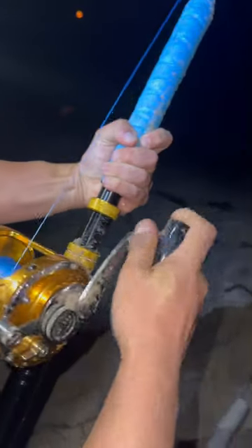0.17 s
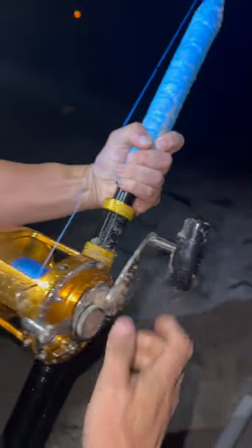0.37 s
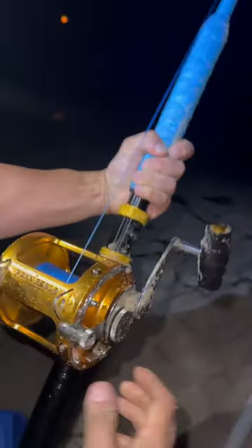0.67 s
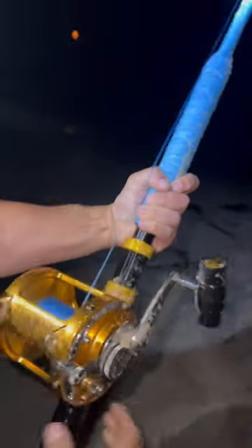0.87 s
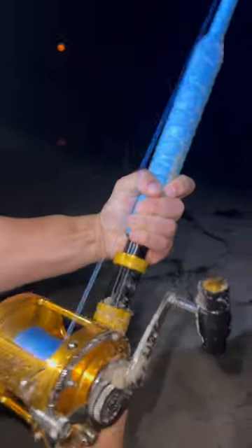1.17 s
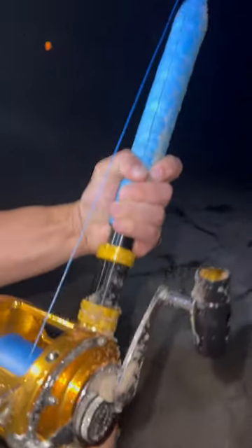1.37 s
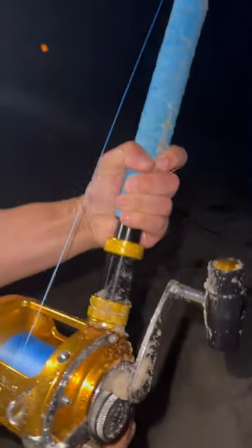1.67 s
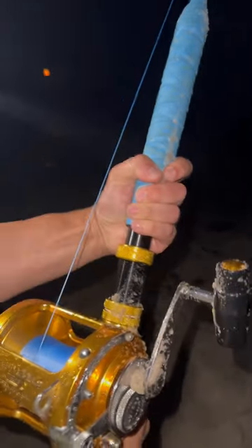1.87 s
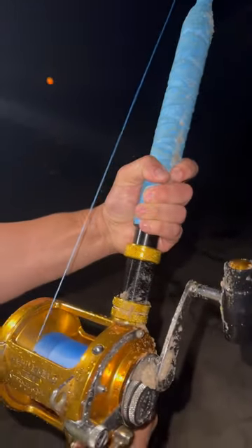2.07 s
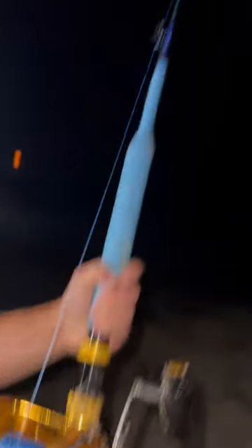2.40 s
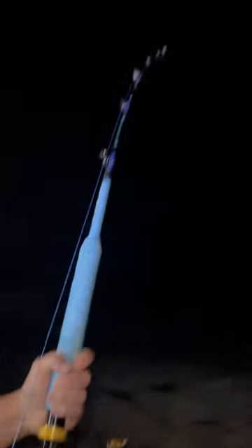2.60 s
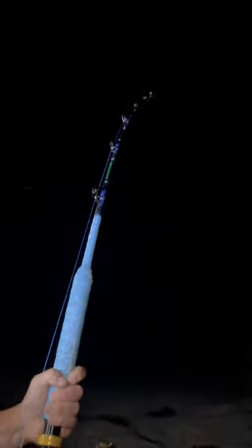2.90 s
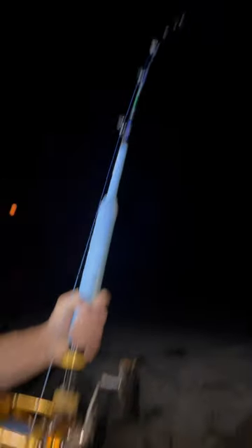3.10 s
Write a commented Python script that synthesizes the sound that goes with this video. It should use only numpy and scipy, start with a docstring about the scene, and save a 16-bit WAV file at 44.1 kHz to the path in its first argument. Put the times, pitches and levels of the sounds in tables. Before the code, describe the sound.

Close stereo pickup by the shore at night: reel clicker starts with separate soft ticks among hand knocks and wind thumps, then accelerates into a loud continuous ratchet with a faint fuzzy whir beneath.

```python
"""By the shore at night, close to a big fishing reel: as line is pulled off, the clicker pawl ticks over its
gear, slowly at first, then as a fast rattle. Each click is a short noise scrape with a tick that rings the
metal housing. Under it lie knocks on rod and handle (sines of falling pitch), wind rumble and a distant wash
(shaped noise), and a fuzzy whir (a drifting resonance). The two microphone ports hear the reel's treble
out of phase."""
import sys
import numpy as np
from scipy import signal
from scipy.fft import rfft, irfft
from scipy.io import wavfile
from scipy.ndimage import uniform_filter1d

SR = 44100
rng = np.random.default_rng(int(sys.argv[2]) if len(sys.argv) > 2 else 0)


def to_wav(sig):
    """Store sig (one row per channel, or 1-D mono) as 16-bit WAV at the path in sys.argv[1].

    Samples outside -1..1 are clipped; the rate is SR.
    """
    pcm = np.clip(np.atleast_2d(sig), -1, 1) * 32767
    pcm = np.round(pcm).astype(np.int16)
    wavfile.write(sys.argv[1], SR, pcm.T)  # frames by channels


N = 143325


def amp(db):
    """Amplitude factor for a level in dB."""
    return 10 ** (np.asarray(db) / 20)


def evened(x):
    """Scale a signal to an RMS of 1 over all its channels."""
    return x / np.sqrt(np.mean(x ** 2) + 1e-20)


def over_time(table, index):
    """One column of a table at every sample, in straight lines between its times."""
    rows = np.array(table)
    return np.interp(np.arange(N) / SR, rows[:, 0], rows[:, index])


def over_frequency(points, hz):
    """A curve of (f/Hz, value) points, in straight lines over log frequency."""
    f, value = np.transpose(points)
    return np.interp(np.log(hz + 1), np.log(f + 1), value)


def resonate(x, hz, width):
    """Shift down by hz, smooth, shift back: a resonance of gain 1 whose pitch may move."""
    turn = np.exp(2j * np.pi * np.cumsum(hz * np.ones(N)) / SR)
    r = np.exp(-np.pi * width / SR)
    smooth = signal.lfilter([1 - r], [1, -r], x / turn + 1e-18)
    return 2 * (turn * smooth).real


def noise(colour, same, patchy_db):
    """Two-channel coloured noise with drifting patches; same(hz) is the left-right likeness."""
    frames, hz = N // 256 + 5, np.fft.rfftfreq(1024, 1 / SR)
    a, b, c, d, patches = rng.standard_normal((frames, 513, 5)).T
    patches = uniform_filter1d(patches, 8, 0)
    patches = evened(uniform_filter1d(patches, 8, 1))
    share = np.clip(same(hz), -1, 1)[:, None]
    left = a + 1j * b
    right = share * left + np.sqrt(1 - share ** 2) * (c + 1j * d)
    spectrum = np.array([left, right])
    spectrum *= amp(over_frequency(colour, hz)[:, None] + patchy_db * patches)
    return evened(signal.istft(spectrum, nperseg=1024, noverlap=768)[1][:, :N])


def wash(hits):
    """Wide distant hiss, and a low whir of drifting pitch: a resonance driven by hiss and clicks."""
    # wash and whir as they come and go: t/s, wash level/dB, whir level/dB, whir f/Hz
    course = [(0, -38.5, -53, 792), (.7, -38.5, -55, 920), (1.05, -37, -39.5, 894), (1.4, -45, -41, 815),
              (1.95, -41, -64, 824.2), (2.02, -38.5, -47, 499.2), (2.25, -38.5, -40.5, 733.5),
              (2.55, -42.5, -38.5, 633), (2.8, -49, -46.5, 620), (3.25, -48.5, -51, 603)]
    # spectrum of the wash: f/Hz, level/dB
    wash_colour = [(180, -51), (330, -12.5), (480, -7), (814, -4.5), (1210, -15.5), (1530, -17),
                   (10000, -30.5), (11900, -73), (16000, -82)]
    # left-right likeness of the wash: f/Hz, share
    likeness = [(100, 0.89), (250, 1), (500, 1), (800, 0.6), (1300, 0.95), (2500, 1), (5000, 1),
                (12000, 0.14)]
    whir_width_hz, whir_tick = 220, 37  # width of each of two passes; push of the clicks against the hiss
    hiss = noise(wash_colour, lambda hz: over_frequency(likeness, hz), patchy_db=2.0)
    hz = over_time(course, index=3)
    # clicks against their local average, so that soft and loud stretches drive about alike
    even = hits / (uniform_filter1d(hits, size=4000) + 1e-4) / 300
    whir = resonate(hiss + whir_tick * even, hz, whir_width_hz)
    whir = evened(resonate(whir, hz, whir_width_hz))
    return amp(over_time(course, index=1)) * hiss + amp(over_time(course, index=2)) * whir


def wind():
    """Wind on the microphone: deep rumble alike in both ports, and buffeting less alike higher up."""
    # gusts: t/s, deep rumble level/dB, buffeting level/dB
    gusts = [(0, -19.5, -39), (.04, -56, -36), (.08, -25, -35), (.12, -54, -37.5), (.17, -23.5, -37),
             (.23, -33, -35.5), (.43, -28, -41.5), (.46, -29, -44), (.5, -35.5, -38.5), (.64, -27, -35),
             (.74, -38.5, -40.5), (.8, -36, -32), (.86, -37.5, -41), (1.05, -44, -44.5), (1.6, -50, -46.5),
             (2.43, -48.5, -46.5), (2.47, -46, -28.5), (2.52, -35, -30.5), (2.55, -43, -38),
             (2.63, -39, -39), (2.67, -46, -30), (2.76, -46, -47), (2.82, -45, -54), (3.25, -53.5, -64)]
    # spectra of rumble and of buffeting: f/Hz, level/dB
    rumble_colour = [(20, -35), (40, 0), (62, 4), (110, -6), (160, -11.5), (400, -80)]
    buffet_colour = [(60, -53), (130, -6), (250, -2.5), (380, -9.5), (600, -15.5), (1500, -35)]
    rumble = noise(rumble_colour, lambda hz: 1 + 0 * hz, patchy_db=-0.5)
    buffet = noise(buffet_colour, lambda hz: 1 - 0.01 * (hz / 250) ** 2, patchy_db=1.5)
    return amp(over_time(gusts, index=1)) * rumble + amp(over_time(gusts, index=2)) * buffet


def knocks():
    """Dull blows on rod and handle: decaying sines whose pitch drops within milliseconds."""
    # blows: t/s, level before rise and decay/dB, start pitch f/Hz, 60 dB decay time t60/s
    blows = [(0.0399, -8.5, 1124, 0.022), (0.1452, -17, 790, 0.03), (0.1754, -9.5, 936, .025),
             (.455, -15, 592, 0.054), (.49, -21, 594, .05), (.785, -22, 895, 0.028)]
    end_share, drop_s, rise_s = 0.212, 0.0037, 0.0027  # end pitch against start pitch
    out, t = np.zeros(N), np.arange(3000) / SR
    for s, db, hz, t60 in blows:
        pitch = hz * (end_share + (1 - end_share) * np.exp(-t / drop_s))
        turns = np.cumsum(pitch) / SR
        envelope = amp(db - 60 * t / t60) * np.minimum(t / rise_s, 1)
        out[round(s * SR):][:3000] -= envelope * np.sin(2 * np.pi * turns)
    return out


def pawl():
    """Pawl strikes: clear clicks, uneven teeth filling the gaps at the running rate, a bounce beside many."""
    # clear clicks: t/s, strike level/dB
    clicks = [(0.0303, -28), (0.0393, -26), (0.052, -30), (0.085, -42), (0.119, -36.5), (0.156, -33),
              (0.1906, -24.5), (0.221, -24.5), (0.2522, -25.5), (0.2806, -25.5), (0.3116, -26.5),
              (0.3447, -27.5), (0.372, -26), (0.3977, -20.5), (0.4175, -23.5), (0.4387, -20), (0.4553, -24),
              (0.47, -24), (0.4888, -26.5), (0.5178, -20.5), (0.5325, -21), (0.5459, -18), (0.5593, -17.5),
              (0.5735, -21.5), (0.5871, -18), (0.599, -24), (0.613, -19), (0.6262, -21.5), (0.6409, -18),
              (0.6504, -18.5), (0.6638, -17), (0.6951, -19), (0.7165, -16), (0.7239, -12), (0.7598, -16),
              (0.8332, -14.5), (0.8409, -10.5), (0.8479, -18), (0.8684, -12.5), (0.8746, -19),
              (0.8933, -9.5), (0.9005, -17), (0.9298, -12.5), (0.9897, -12), (1.0056, -7), (1.0126, -8),
              (1.0212, -4.5), (1.038, -8), (1.0748, -11.5), (1.0815, -8.5), (1.0996, -11), (1.117, -8.5),
              (1.1267, -10.5), (1.1338, -16), (1.2189, -8), (1.2296, -13.5), (1.2404, -11.5), (1.2536, -13),
              (1.2658, -10.5), (1.3417, -10.5), (1.3778, -15), (1.4132, -10.5), (1.4202, -11),
              (1.4251, -40), (1.4406, -14.5), (1.4972, -15.5), (1.5059, -14), (1.5162, -14), (1.5955, -17),
              (1.6361, -15.5), (1.7669, -12.5), (1.7816, -12.5), (1.9014, -16), (1.9128, -13),
              (1.9391, -12.5), (1.9573, -11.5), (1.9897, -11.5), (2.03, -12.5), (2.0493, -14), (2.0994, -9),
              (2.149, -10), (2.1555, -12), (2.179, -9), (2.1891, -8.5), (2.2331, -11), (2.2756, -9),
              (2.3066, -14), (2.388, -6), (2.3977, -9.5), (2.4073, -7), (2.426, -10.5), (2.4365, -12),
              (2.4471, -8.5), (2.4679, -15), (2.4894, -9), (2.4982, -11.5), (2.519, -8.5), (2.5294, -7),
              (2.5966, -13.5), (2.6124, -28), (2.6281, -14), (2.683, -12.5), (2.69, -9), (2.7016, -14),
              (2.7086, -14.5), (2.7231, -6.5), (2.77, -9.5), (2.7984, -16), (2.8137, -10), (2.8223, -10.5),
              (2.8474, -14), (2.8812, -12.5), (2.9127, -11.5), (2.9662, -10), (2.9916, -10), (3.013, -13),
              (3.0346, -9.5), (3.0437, -11), (3.0498, -16), (3.059, -10), (3.0925, -13), (3.1194, -13),
              (3.1423, -12), (3.157, -13), (3.1797, -13.5), (3.2105, -13), (3.2366, -13.5), (3.2447, -13)]
    # fast run, the clicks between: t/s, rate/clicks per s, mean strike level/dB
    run = [(.65, 126.7, -20.5), (.8, 134.7, -15), (1.05, 136, -9.5), (1.3, 141, -13.5),
           (1.65, 147.5, -19.5), (2.05, 129.5, -12), (2.35, 138, -12.5), (2.8, 126, -13.5),
           (3.25, 140, -16.5)]
    jitter, spread_db = .1, 1.5  # jitter in tooth spacings
    bounce_share, bounce_s, bounce_db, early_share = .75, .0028, -6, .5
    s, db = np.transpose(clicks)
    rows = np.array(run)
    # whole teeth counted from each clear click of the run to the next
    ends = np.sort(np.r_[s[s > rows[0, 0]], (N - 1) / SR])
    tooth = np.interp(ends, np.arange(N) / SR, np.cumsum(over_time(run, index=1)) / SR)
    count = np.r_[0, np.cumsum(np.maximum(np.round(np.diff(tooth)), 1))]
    whole = np.setdiff1d(np.arange(count[-1]), count)
    draw = rng.standard_normal((600, 2))[:len(whole)]
    between = np.interp(whole + np.clip(jitter * draw[:, 0], -.4, .4), count, ends)
    level = np.interp(between, rows[:, 0], rows[:, 2]) + spread_db * draw[:, 1]
    at = (np.r_[s, between] * SR).astype(int)
    db = np.r_[db, level]
    # a bounce falls just before or just after its click
    u = rng.random((800, 3))[:len(at)]
    side = np.sign(u[:, 2] - early_share)
    offset = (bounce_s * SR * (0.85 + .6 * u[:, 0]) * side).astype(int)
    bounce_at = np.clip(at + offset, 0, N - 1)
    hits = np.zeros(N)
    np.add.at(hits, at, amp(db))
    np.add.at(hits, bounce_at, (u[:, 1] < bounce_share) * amp(db + bounce_db))
    return hits


def reel(hits):
    """Each click scrapes and ticks, ringing every housing mode by its own amount; the ports differ in part."""
    # colour as the reel turns to and from the microphone:
    # t/s, then level/dB of ring, frame, spool, treble, low and top modes
    mode_levels = [(0, -5.5, -12, -8.5, -10, -5, -10.5), (.47, -7.5, -11, -12.5, -8.5, -10.5, -6.5),
                   (.62, 1.5, -17, -8.5, -9, -13, -5.5), (.85, 1, -16.5, -10, -10, -11.5, -8.5),
                   (1.1, -1.5, -15, -12, -14.5, -16, -13), (1.36, -6.5, -12.5, -6, -7.5, -11.5, -9),
                   (1.68, -4.5, -8, -1.5, -4.5, -7, -6), (1.97, 2, -13.5, -7.5, -11.5, -16.5, -9.5),
                   (2.3, -4.5, -15, -11.5, -13, -15, -17), (2.6, 0, -17.5, -18.5, -15.5, -21, -14),
                   (2.9, 1, -18.5, -21, -16, -22, -18), (3.25, 0.5, -17, -17.5, -14, -18, -14.5)]
    # housing modes, each list: f/Hz, width of one of three equal stages/Hz, relative level/dB
    ring = [(6068, 556, -3)]
    frame = [(3698, 500, 0)]
    spool = [(4234, 424, -1.9), (5337, 1180, -0.44)]
    treble = [(7470, 1400, -0.7), (8460, 910, 0.55), (8970, 780, 2.84)]
    low = [(1303, 555, -9), (1706, 363, -9.5), (2226, 1340, -4.5), (2975, 540, -6)]
    top = [(10400, 2200, -2), (12600, 1700, -2), (14900, 2600, -3)]
    # spacing of the ports: f/Hz, phase by which the left leads/rad
    port = [(0, 0), (1600, -.1), (4600, -.25), (6200, -.9), (7240, -1.3), (9130, -2.1), (10400, -2.75),
            (16500, -2.7)]
    rise_s, fall_s = .0005, .0008
    tick, ring_tick = 22., 30.  # tick against scrape; the ring modes have their own
    rattle_db, vary_db, apart = -6, 1.3, 0.24  # apart: side scrape against middle scrape
    t, hz = np.arange(600) / SR, np.fft.rfftfreq(N, 1 / SR)
    shape = (1 - np.exp(-t / rise_s)) ** 2 * np.exp(-t / fall_s)
    out = np.zeros((2, N))  # middle and side
    for k, modes in enumerate([ring, frame, spool, treble, low, top]):
        for f, w, db in modes:
            own = hits * amp((vary_db if k else 1) * rng.standard_normal(N))
            push = signal.oaconvolve(own, shape / shape.max())[:N]
            push += amp(rattle_db) * uniform_filter1d(push, size=2000)  # steady rattle under the clicks
            drive = push * rng.standard_normal((2, N)) * [[1], [apart]]
            drive[0] += (tick if k else ring_tick) * np.roll(own, round(rise_s * SR))
            answer = amp(db) * np.sqrt(SR / w / 8) / (1 + 2j * (hz - f) / w) ** 3
            out += irfft(rfft(drive) * answer, N) * amp(over_time(mode_levels, index=k + 1))
    turn = np.exp(.5j * over_frequency(port, hz))
    left_right = [out[0] + out[1], out[0] - out[1]]
    return irfft(rfft(left_right) * np.array([turn, 1 / turn]), N)


def scene():
    """The reel close by, over knocks, wind and the distant wash."""
    hits = pawl()
    return reel(hits) + knocks() + wind() + wash(hits)


def record(dry):
    """Soft ceiling, bass cut, then the band limit."""
    bass_cut_hz, edge_hz = 42, 15900
    held = 1.223 * np.tanh(dry / 1.263)
    held = signal.sosfilt(signal.butter(3, bass_cut_hz, 'high', fs=SR, output='sos'), held)
    band = signal.firwin(511, edge_hz, window=("kaiser", 9), fs=SR)
    return signal.oaconvolve(held, band[None], "same")


dry = scene()
out = record(dry)
to_wav(out)
```